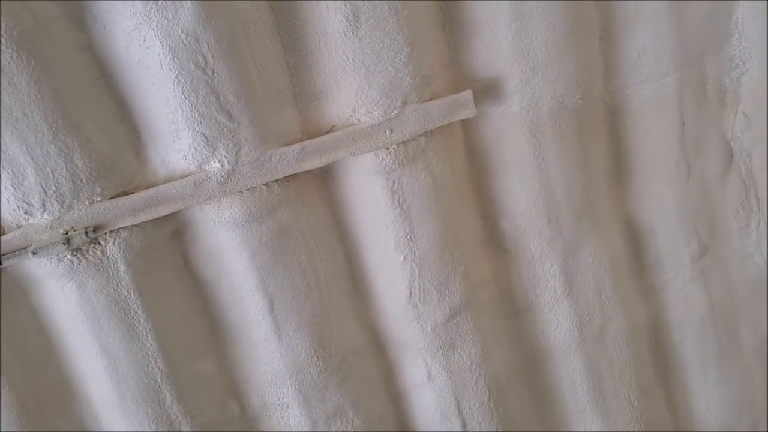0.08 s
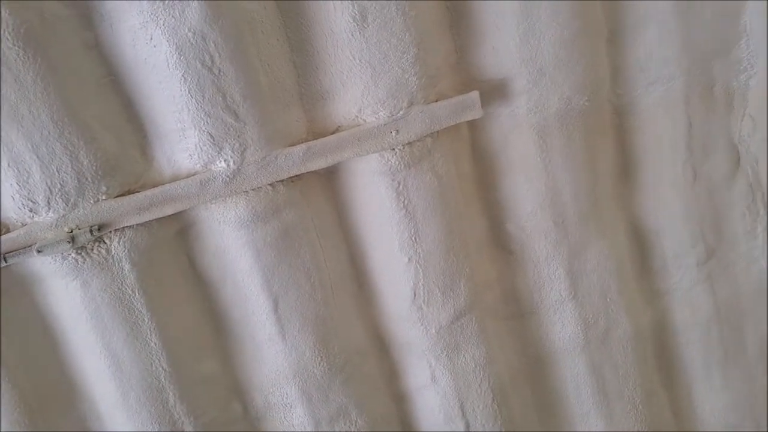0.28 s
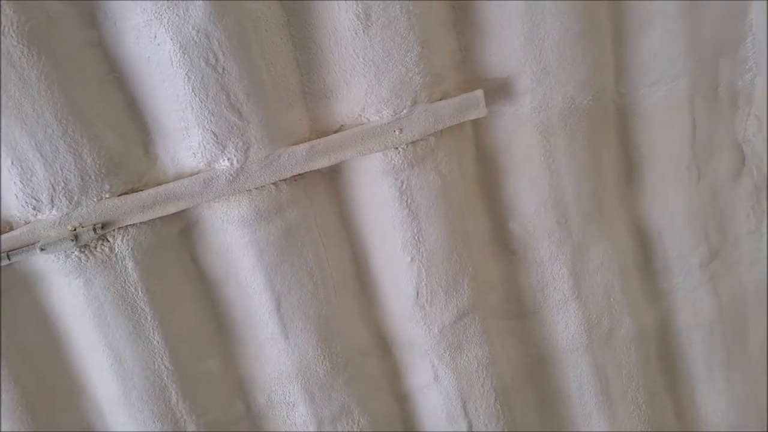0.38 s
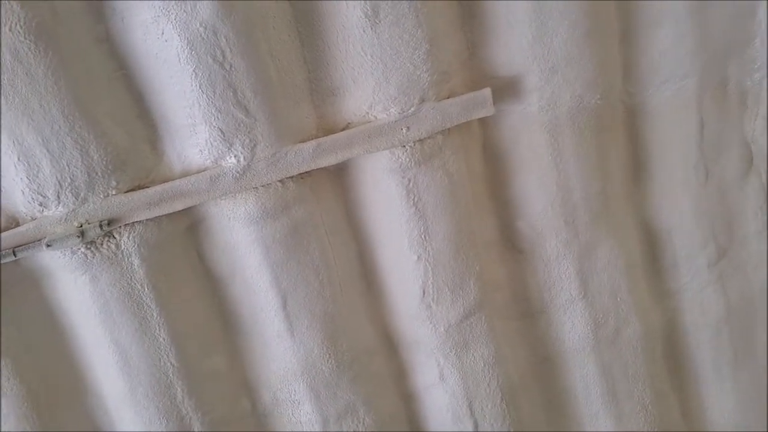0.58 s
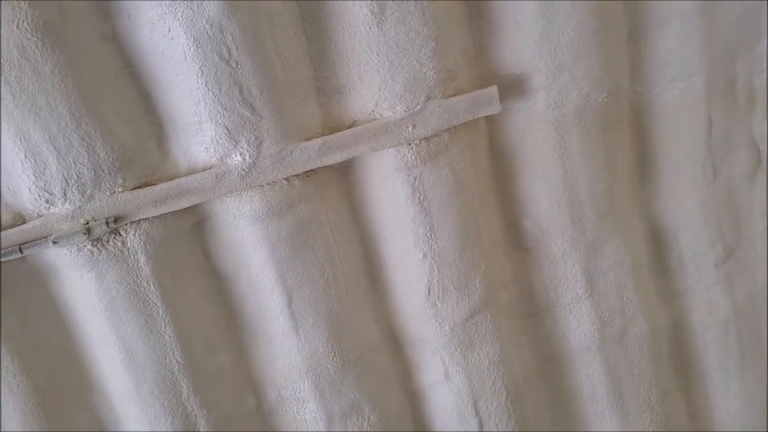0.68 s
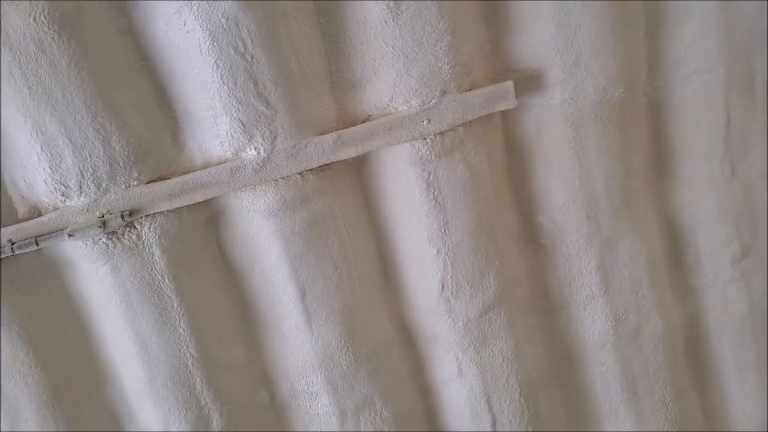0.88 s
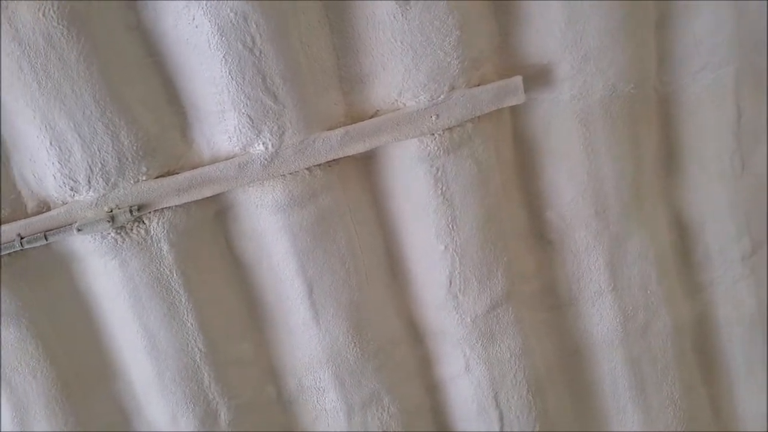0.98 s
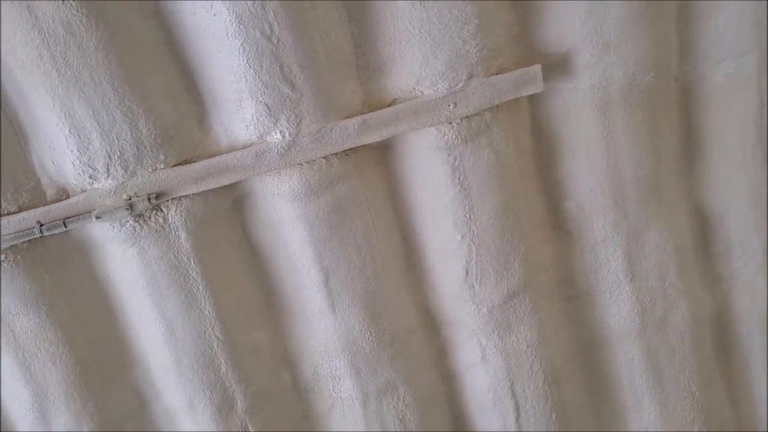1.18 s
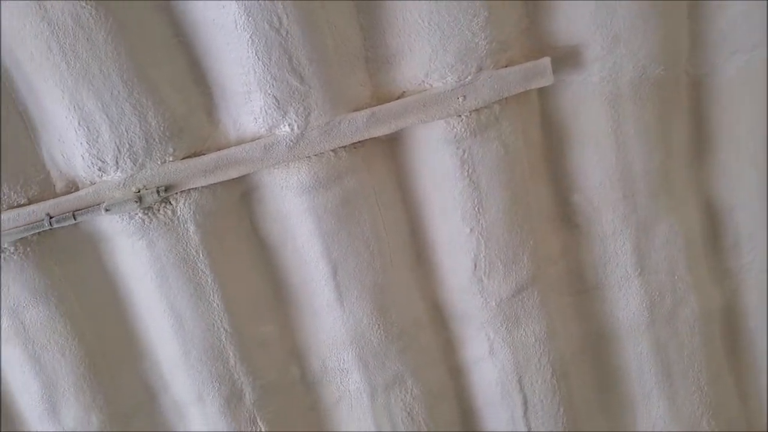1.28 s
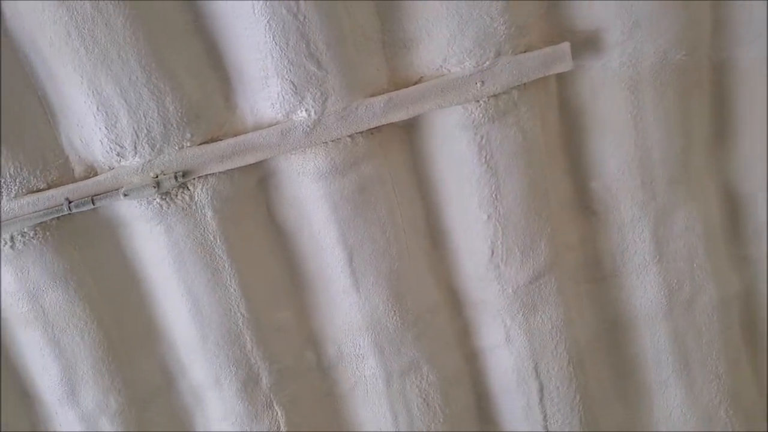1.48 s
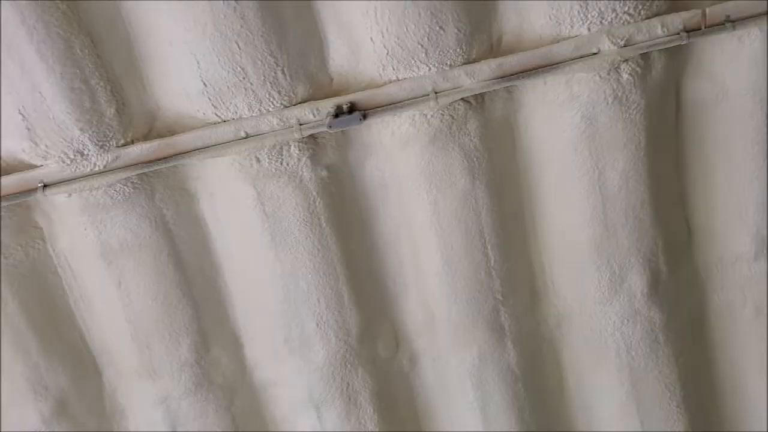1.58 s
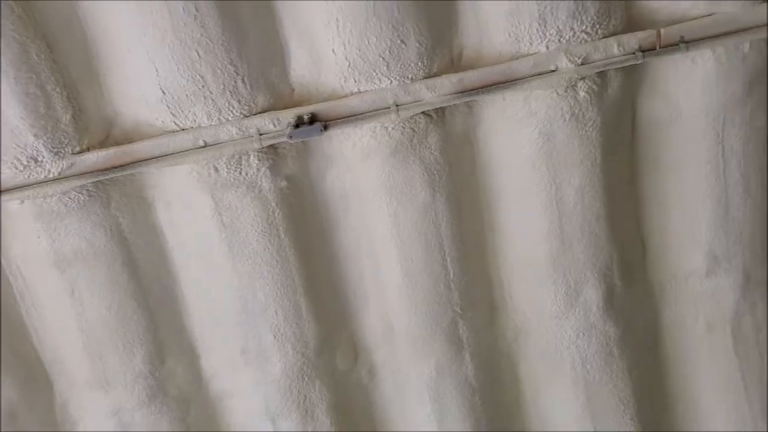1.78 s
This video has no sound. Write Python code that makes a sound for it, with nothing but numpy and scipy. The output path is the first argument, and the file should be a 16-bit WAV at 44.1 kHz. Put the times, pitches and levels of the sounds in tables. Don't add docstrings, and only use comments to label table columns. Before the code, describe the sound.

A single hard, bright crack of stiff foam breaking from a metal roof, just after the fading tail of an earlier pop; dense reverberation and low panel boom fill a large hall, captured in stereo.

```python
import sys
import numpy as np
from scipy import signal
from scipy.fft import rfft, irfft, next_fast_len
from scipy.io import wavfile
from scipy.ndimage import map_coordinates

SR = 44100
rng = np.random.default_rng(int(sys.argv[2]) if len(sys.argv) > 2 else 0)


def bounce(signal):
    frames = np.transpose(np.atleast_2d(signal))
    limited = np.clip(frames, -1, 1)
    pcm = np.round(limited * 32767).astype(np.int16)
    wavfile.write(sys.argv[1], SR, pcm)


def voltage_ratio(level):
    return 10 ** (np.asarray(level, float) / 20)


N = 79380

# frequency in Hz, density in dB per Hz.
FLOOR_SPECTRUM = [(30, -18.5), (62, 0), (150, -16), (300, -23.5), (650, -37), (1100, -30.5), (3000, -33.5),
                  (12000, -41.5)]
# time in seconds, level in dB.
RUMBLE_SWELL = [(0, -68.5), (.5, -72.5), (.75, -75), (1.05, -80), (1.19, -84), (1.27, -77.5), (1.37, -82),
                (1.5, -74), (1.62, -70.5), (1.72, -74.5), (1.8, -78.5)]
# frequency in Hz, correlation from 0 to 1.
CHANNEL_LIKENESS = [(30, 0.83), (70, .85), (150, 0.83), (300, 0.84), (640, 0.29), (1400, 0.), (15000, 0.49)]
# centre in Hz, width in Hz, level in dB.
INSECT_BANDS = [(5557, 350, 4.5), (5180, 450, -5), (6560, 310, -4), (8660, 1500, -4.5)]
# frequency in Hz, density in dB per Hz.
EARLIER_SPECTRUM = [(40, -13), (100, -12.5), (250, -7), (450, -5), (700, -9), (1100, 0.5), (1900, -9.5),
                    (2600, -10)]
# frequency in Hz, density in dB per Hz.
CRACK_SPECTRUM = [(45, -29.5), (110, -18), (260, -7.5), (440, -1.5), (540, -6), (640, -8), (1400, -9),
                  (3000, -6)]
# frequency in Hz, 60 dB decay time in seconds.
HALL_DECAY = [(60, 1.6), (250, 1.007), (600, 1.045), (1100, 0.61), (1900, 0.54), (3200, 0.63), (6000, 0.59),
              (12000, 0.42)]
# frequency in Hz, fill-up time in seconds.
HALL_BUILD_UP = [(60, .12), (150, 0.02), (400, 0.0015), (900, .015), (2000, .003), (6000, 0.0013),
                 (13000, 0.0045)]
# frequency in Hz, gain in dB.
HALL_TREBLE = [(3000, 2.5), (6000, -3), (10500, -6), (12500, -14), (14000, -27.5), (15000, -39),
               (16000, -61.5)]
# frequency in Hz, level in dB, 60 dB decay time in seconds.
PANEL_MODES = [(102, -54, 1.0), (155, -53, 1.1), (253, -48, 1.05), (331, -45, 1.25), (396, -43, 1.2),
               (438, -46, 1.1), (467, -39, .95), (519, -47, .8), (550, -50, .8)]
# start in seconds, level in dB, left over right in dB.
SNAP_ARRIVALS = [
    (.2036, -5.5, 10),
    (.2053, -13, 6),
    (.2096, -11, 3),
    (.2172, -19, -2),
]
# frequency in Hz, level in dB, 60 dB decay time in seconds.
SKIN_MODES = [(430, -21, .03), (1650, -14, .012), (2700, -22, .008), (4800, 0, .0046), (5800, -2, .0042),
              (6900, 0, .003), (9300, -2, .0035), (10600, -8, .003), (12400, -12, .004), (14800, -30, .003)]
# frequency in Hz, gain in dB.
LEFT_PORT = [(60, 0.5), (400, 3.04), (3300, 2), (4800, 6), (6200, 4), (7400, -13), (8900, -5),
             (11000, -13.5)]
# frequency in Hz, gain in dB.
RIGHT_PORT = [(60, 0), (400, 1), (3000, 2.5), (3800, -5), (6500, -9.5), (7600, -22), (9800, -22.5),
              (11500, -15.5)]

TIME_S = np.arange(N) / SR
CRACK_S = .2042


def unit(x):
    return x / np.sqrt(np.mean(x ** 2) + 1e-20)


def along(points, hz):
    f, v = np.transpose(points)
    return np.interp(np.log(hz + 1), np.log(f + 1), v)


def wobble(rate_hz):
    knots = rng.standard_normal(int(N * rate_hz / SR) + 4)
    return map_coordinates(knots, [np.arange(N) * rate_hz / SR])


def stereo_noise():
    return rng.standard_normal((2, N))


def filtered(x, response):
    m = next_fast_len(N + 8192)
    return irfft(rfft(x, m) * response(np.fft.rfftfreq(m, 1 / SR)), m)[..., :N]


def causal(points):
    def response(hz):
        cepstrum = irfft(np.log(voltage_ratio(along(points, hz))))
        half = len(cepstrum) // 2
        folded = np.r_[cepstrum[0], 2 * cepstrum[1:half], np.zeros(len(cepstrum) - half)]
        return np.exp(rfft(folded))
    return response


def diffuse(spectrum):
    def mid_side(hz):
        angle = np.arccos(np.clip(along(CHANNEL_LIKENESS, hz), -1, 1)) / 2
        return voltage_ratio(along(spectrum, hz)) * [np.cos(angle), np.sin(angle)]
    mid, side = filtered(stereo_noise(), mid_side)
    return unit(np.array([mid + side, mid - side]))


def floor():
    noise = diffuse(FLOOR_SPECTRUM)
    low = filtered(noise, lambda hz: 1 / (1 + (hz / 200) ** 4))
    s, db = np.transpose(RUMBLE_SWELL)
    left_db = -7.5
    swell_db = np.interp(TIME_S, s, db - db.mean()) + wobble(12) + [[left_db], [0]]
    return voltage_ratio(-70) * (noise + low * (voltage_ratio(swell_db) - 1))


def insects():
    def bands(hz):
        return sum(voltage_ratio(db) * np.exp(-((hz - centre) / width) ** 2) for centre, width, db in INSECT_BANDS)
    buzz_hz = 73 * (1 + .02 * wobble(5.8))
    depth = np.clip(.24 * (1 + .3 * wobble(4)), 0, 1)
    buzz = 1 + depth * np.sin(2 * np.pi * np.cumsum(buzz_hz) / SR)
    level_db = -64.5 - 1.5 * TIME_S + .7 * wobble(6.6)
    return voltage_ratio(level_db) * buzz * unit(filtered(stereo_noise(), bands))


def dying_db(age, t60):
    hold_s, fade_s, fade_db_per_s = .14, .84, 70
    fall = -60 * (np.hypot(age, hold_s) - hold_s) / t60
    return fall - fade_db_per_s * np.maximum(age - fade_s, 0)


def hall(start_s, level_db, spectrum, t60_share):
    noise = filtered(diffuse(spectrum), causal(HALL_TREBLE))
    hz, t, z = signal.stft(noise, SR, nperseg=256)
    age = np.maximum(t - start_s, 1e-3)
    fill_s = along(HALL_BUILD_UP, hz)[:, None]
    t60 = t60_share * along(HALL_DECAY, hz)[:, None]
    shape = (1 - np.exp(-age / fill_s)) * voltage_ratio(dying_db(age, t60))
    tail = signal.istft(z * shape, SR, nperseg=256)[1][:, :N]
    gate = np.clip((TIME_S - start_s) / .001, 0, 1)
    return voltage_ratio(level_db) * gate * tail


def earlier_pop():
    return hall(-0.3, -28.5, EARLIER_SPECTRUM, t60_share=0.86)


def roof():
    age = np.maximum(TIME_S - CRACK_S, 0)
    boom = np.zeros((2, N))
    for hz, db, t60 in PANEL_MODES:
        apart = 0.33 * wobble(11) * np.array([[1], [-1]])
        blur = 1.25 * wobble(11) + apart
        boom += voltage_ratio(db + dying_db(age, t60)) * np.sin(2 * np.pi * hz * age + blur)
    round_trip_s, return_db, sharpness = 0.16, 4, 7.2
    returns = np.abs(np.cos(np.pi * age / round_trip_s)) ** sharpness * (age > round_trip_s / 2)
    rise = 1 - np.exp(-age / .004)
    pan_db = 0.5
    return rise * voltage_ratio(return_db * returns - 0.4) * boom * voltage_ratio([[pan_db / 2], [-pan_db / 2]])


def lead_in():
    lead_s, centre_hz, width_hz = .0035, 2000, 1500
    u = (TIME_S - CRACK_S) / lead_s + 1
    swell = np.clip(np.minimum(u, 3 - 2 * u), 0, 1)
    tremor = filtered(stereo_noise(), lambda hz: np.exp(-((hz - centre_hz) / width_hz) ** 2))
    return voltage_ratio(-44) * unit(tremor) * swell


def snaps():
    out = np.zeros((2, N))
    t = np.arange(SR // 20) / SR
    rise = 1 - np.exp(-(t / .0008) ** 2)
    shade_hz, noise_db, noise_t60_s = 4000, -16, .004
    high_pass = signal.butter(2, 1220, "high", fs=SR, output="sos")
    for start_s, db, pan_db in SNAP_ARRIVALS:
        side = voltage_ratio([[pan_db / 2], [-pan_db / 2]])
        ring = np.zeros((2, len(t)))
        for hz, level_db, t60 in SKIN_MODES:
            mode = voltage_ratio(level_db - 60 * t / t60) * np.sin(2 * np.pi * hz * t)
            ring += mode * side ** (hz > shade_hz)
        noise = signal.sosfilt(high_pass, rng.standard_normal((2, len(t))))
        spit = voltage_ratio(noise_db - 60 * t / noise_t60_s) * noise
        out[:, round(start_s * SR):][:, :len(t)] += voltage_ratio(db) * (ring + side * spit) * rise
    return out


def scene():
    background = floor() + insects() + earlier_pop()
    reverberation = hall(CRACK_S, -20.5, CRACK_SPECTRUM, t60_share=1)
    return background + reverberation + roof() + lead_in() + snaps()


def top_cut(x):
    return signal.sosfilt(signal.butter(12, 15610, fs=SR, output="sos"), x)


def record(dry):
    dry = signal.sosfilt(signal.butter(2, 16, "high", fs=SR, output="sos"), dry)
    left = filtered(dry[0], causal(LEFT_PORT))
    right = filtered(dry[1], causal(RIGHT_PORT))
    hiss = voltage_ratio(-79.5) * np.diff(rng.standard_normal((2, N + 1))) / 2
    return top_cut(np.array([left, right]) + hiss)


dry = scene()
out = record(dry)
bounce(out)
```